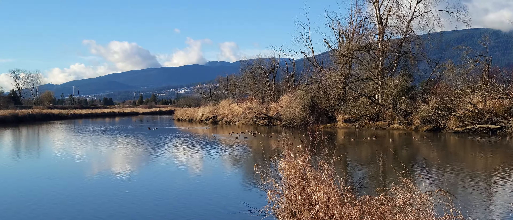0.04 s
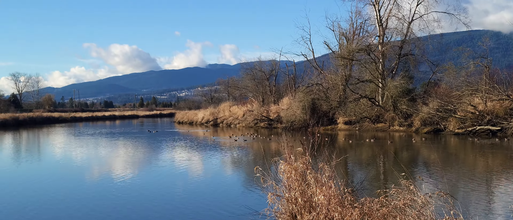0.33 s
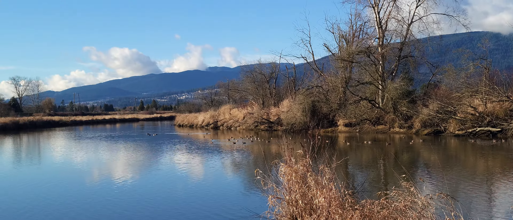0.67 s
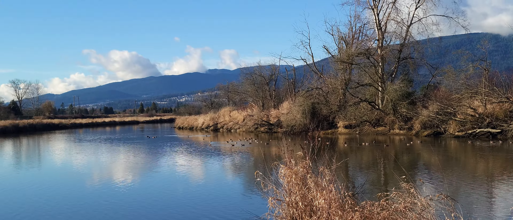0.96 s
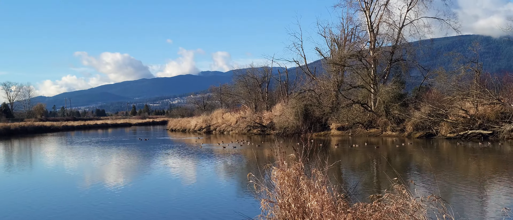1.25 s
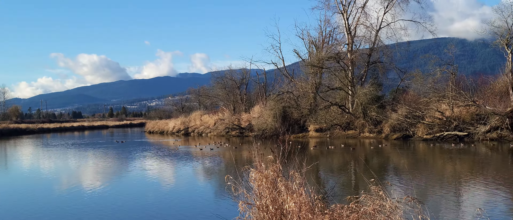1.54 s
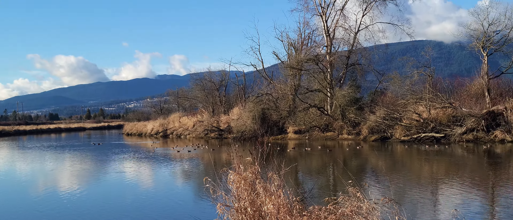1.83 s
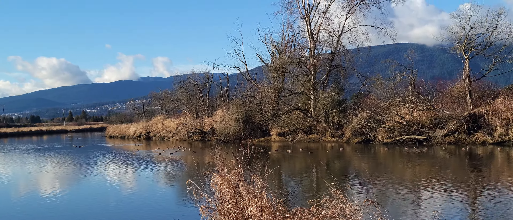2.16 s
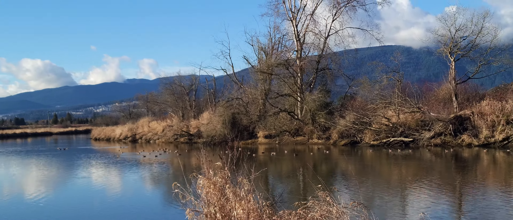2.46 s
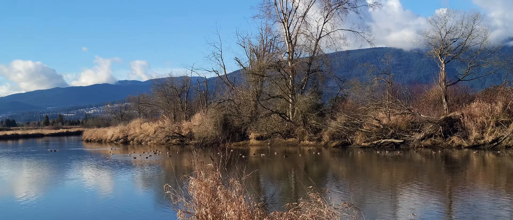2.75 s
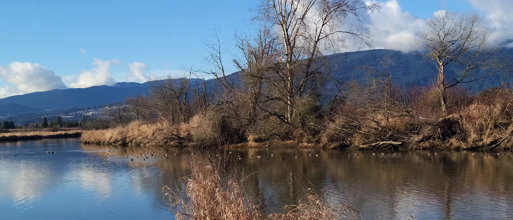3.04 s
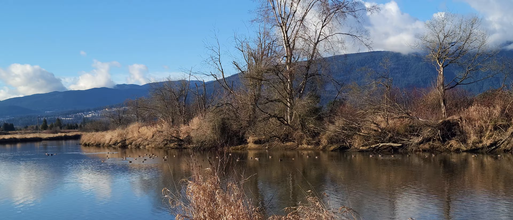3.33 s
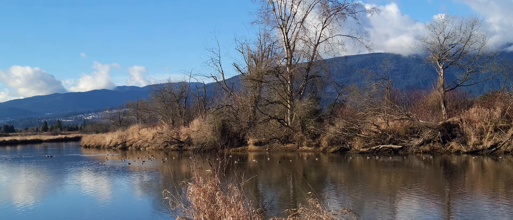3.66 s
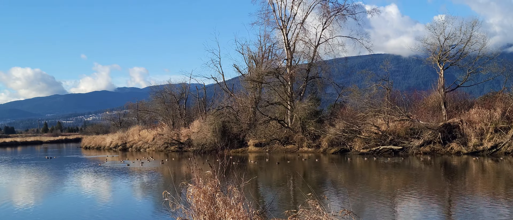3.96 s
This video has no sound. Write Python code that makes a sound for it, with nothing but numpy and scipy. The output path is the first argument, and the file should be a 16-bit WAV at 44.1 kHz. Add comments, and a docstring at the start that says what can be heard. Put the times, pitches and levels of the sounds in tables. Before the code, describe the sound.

A water bird calls in a quiet open marsh. Faint low rumble, soft thumps and a close click come first, then very faint distant whistles, two short, slightly rough yelps from the left with light echoes, and another click.

```python
"""A water bird gives two short, arching yelps in a quiet marsh, and the wooded bank answers faintly.
Each yelp sweeps slightly rough harmonics through the fixed resonances of the throat; the bank
returns two distinct echoes and a scattered tail. Far birds whistle just before and blip after.
Underneath lie a low rumble with soft thumps, a thin, wide hush and very faint ticking,
while a few small dry clicks sound close by."""
import sys
import numpy as np
from scipy import signal
from scipy.fft import rfft, irfft, next_fast_len
from scipy.io import wavfile
from scipy.ndimage import uniform_filter1d, map_coordinates

SR = 44100
rng = np.random.default_rng(int(sys.argv[2]) if len(sys.argv) > 2 else 0)


def put_to_file(sound):
    """Save the sound as 16-bit audio at rate SR, in the file named by the first command-line argument."""
    columns = np.atleast_2d(sound).T  # one column per channel
    safe = np.clip(columns, -1, 1)
    whole_steps = np.round(safe * 32767)
    wavfile.write(sys.argv[1], SR, whole_steps.astype(np.int16))


N = 176400

# Fader ride of the rumble: time_s, level_db
RUMBLE_RIDE = [(0, -48), (.3, -52), (.52, -45.5), (.62, -51), (.85, -47), (1.08, -47), (1.16, -52),
               (1.48, -51), (1.7, -53), (1.98, -55), (2.08, -45.5), (2.22, -52.5), (2.46, -53.5),
               (2.7, -51.5), (4, -49)]
# Tone of the rumble: frequency_hz, gain_db
RUMBLE_EQ = [(15, -23.5), (25, -10.5), (40, -7), (55, -3), (70, -1), (84, 2), (95, -8.5), (120, -17.5),
             (150, -29), (200, -40)]
# Stereo width of the rumble: frequency_hz, side_minus_mid_db
RUMBLE_WIDTH = [(30, -2), (70, -6.5), (150, -7.5)]
# Pan move of the rumble: time_s, left_minus_right_db
RUMBLE_PAN = [(0, -4.5), (1.2, -10.5), (2, -5), (2.7, -1), (3.3, -3), (4, 0)]
# Soft thumps that stand out of the rumble: centre_s, peak_db
THUMPS = [(0.261, -39), (0.816, -41), (0.971, -37.5), (1.103, -36.5), (2.461, -38.5)]

# Fader ride of the hush: time_s, level_db
HUSH_RIDE = [(0.0, -73), (0.54, -73.5), (2.33, -75), (2.96, -74), (3.87, -75.5), (4.0, -75.5)]
# Tone of the hush: frequency_hz, gain_db
HUSH_EQ = [(110, -32), (180, -2), (360, -1.5), (395, -6.5), (495, -4), (543, -6), (597, -3), (719, -3),
           (1010, -13), (1360, -7), (1700, -8), (2880, -17.5), (3950, -20.5), (5040, -25.5), (6310, -23.5),
           (6930, -18.5), (9350, -39.5), (11500, -28.5), (15800, -33)]
# Stereo width of the hush and its swell: frequency_hz, side_minus_mid_db
HUSH_WIDTH = [(200, -2), (300, -2.5), (470, 5.5), (750, 8), (1100, 13), (1600, 0), (2400, 2), (4000, 0),
              (14000, 0.5)]
# Fader ride of the low-mid swell: time_s, level_db
SWELL_RIDE = [(0, -80.5), (1.2, -88.5), (2.3, -100), (2.8, -75), (3.15, -76), (3.5, -74), (4, -82)]
# Tone of the swell: frequency_hz, gain_db
SWELL_EQ = [(120, -51), (260, 3), (350, -3), (550, -7), (1000, -27), (2000, -75)]

# Tone of the faint ticks: frequency_hz, gain_db
TICK_EQ = [(2000, -16), (4000, -7), (9000, -16), (12000, -3), (16000, -16)]
# Close dry clicks: start_s, crack_db, low_cut_hz, high_cut_hz, left_minus_right_db,
# rings as (pitch_hz, level_db, t60_s)
CLICKS = [(.189, -64, 5000, 14100, -6, [(7060, -64, .004), (12200, -70, .004)]),
          (0.6562, -37.5, 1200, 3750, -7, [(1500, -48.5, 0.0044), (3090, -48.5, 0.0085),
          (4200, -53, 0.0086), (6640, -53, 0.0028), (13000, -67, .002)]),
          (1.0344, -63.5, 6000, 14000, -7, [(2970, -61.5, .011), (9440, -66, 0.005), (12500, -68, .005)]),
          (1.050, -67, 8000, 15100, 8, [(12000, -65, .005), (14500, -67, .005)]),
          (1.3128, -64, 9000, 16000, 11, [(12900, -58, .0032), (14700, -58, 0.0035)]),
          (2.715, -69, 6000, 12000, -6, [(6950, -62, 0.0046), (9500, -69, .005)]),
          (2.9746, -70, 5000, 13000, 5, [(1960, -69, 0.019), (5850, -65, 0.022)]),
          (3.39, -50.5, 2780, 8750, 2, [(3400, -59, 0.0048), (4200, -52.5, .004), (5400, -60, 0.005),
          (10200, -58, 0.0097), (15000, -58, .006)]), (3.495, -67, 6000, 15000, -3, [(6070, -64, .005),
          (9900, -77, .005)])]

# Rising whistles of far birds: start_s, end_s, from_hz, to_hz, level_db
WHISTLES = [(2.272, 2.35, 2340, 2540, -74.5), (2.292, 2.338, 3050, 3160, -78.5),
            (2.358, 2.398, 2850, 2960, -75), (2.398, 2.44, 3130, 3190, -77), (2.44, 2.48, 3350, 3550, -82)]
# Far calls heard only as soft blips: centre_s, half_width_s, centre_hz, level_db
BLIPS = [(3.512, .012, 1720, -68.5), (3.905, .025, 1680, -71)]
# How far the yelps and whistles lean left: frequency_hz, left_minus_right_db
BIRD_BALANCE = [(1500, 4), (1850, 4), (2120, 21), (2500, 25), (3200, 6), (4200, 7)]
# Decay of the bank's tail: frequency_hz, t60_s
BANK_DECAY = [(500, 0.53), (2000, 0.4), (3200, 0.32), (6000, 0.24)]

# Pitch arches, one list per yelp: time_s, pitch_hz
YELP_ARCHES = [
    [(2.588, 870), (2.604, 1170), (2.616, 1630), (2.621, 1989), (2.642, 2152), (2.664, 2012), (2.676, 1848),
     (2.680, 1575), (2.703, 1200), (2.725, 1139), (2.74, 940)],
    [(2.856, 940), (2.869, 1200), (2.884, 1620), (2.896, 1830), (2.905, 1824), (2.912, 1590), (2.922, 1450),
     (2.936, 1227), (2.964, 938)],
]
# Drive of each yelp into the throat: level_db, tilt_per_harmonic_db
YELP_DRIVE = [(-43.5, -1), (-42, -1)]
# Harmonics of the voice: multiple, gain_db
HARMONICS = [(1, 7), (2, -4), (3, -41)]
# Resonances of the throat: frequency_hz, gain_db
THROAT_EQ = [(900, -31), (1250, -27.5), (1480, -12.5), (1690, -14.5), (1860, -4.5), (2120, -3), (2290, 2),
             (2700, -14), (3200, 5.5), (3450, -15), (3680, -14), (3850, -31), (4150, -11.5), (4600, -33),
             (7000, -48)]
# Distinct returns from the bank: delay_s, gain_db
ECHOES = [(.085, -20.5), (.133, -30)]


def amp(db):
    """Decibels to gain."""
    return 10 ** (np.asarray(db) / 20)


def unit(x):
    """Scale to rms 1."""
    return x / np.sqrt(np.mean(x ** 2) + 1e-20)


def along(points, hz):
    """Read (frequency_hz, value) points on a log frequency axis."""
    freqs, values = np.transpose(points)
    return np.interp(np.log(hz + 1), np.log(freqs + 1), values)


def automation(points):
    """Join (time_s, value) points into one value per sample."""
    return np.interp(np.arange(N) / SR, *np.transpose(points))


def wobble(per_s):
    """A smooth random curve through per_s knots a second."""
    knots = rng.standard_normal(int(N * per_s / SR) + 4)
    return map_coordinates(knots, [np.arange(N) * per_s / SR])


def filtered(x, response):
    """Pass x through a complex frequency response."""
    size = next_fast_len(N + SR // 2)
    return irfft(rfft(x, size) * response(np.fft.rfftfreq(size, 1 / SR)), size)[..., :N]


def panned(db):
    """Left and right gains for a left-minus-right level."""
    return amp(np.array([np.atleast_1d(db), -np.atleast_1d(db)]) / 2)


def noise_bed(eq, width):
    """Shaped stereo noise whose mid has rms 1."""
    mid = filtered(rng.standard_normal(N), lambda hz: amp(along(eq, hz)))
    side = filtered(rng.standard_normal(N), lambda hz: amp(along(eq, hz) + along(width, hz)))
    return np.array([mid + side, mid - side]) / mid.std()


def gate(start, end, attack_s=0.0086, release_s=0.0095):
    """Attack, hold and release of a note."""
    t = np.arange(N) / SR
    return np.clip((t - start) / attack_s, 0, 1) * np.clip((end - t) / release_s, 0, 1)


def rumble(trim_db=-1, flutter_db=1, thump_hz=68, thump_half_width_s=0.012):
    """A low, uneven rumble with a few soft thumps, at first stronger on the right."""
    t, thumps = np.arange(N) / SR, np.zeros(N)
    level = amp(trim_db + automation(RUMBLE_RIDE) + flutter_db * wobble(14))
    for centre_s, peak_db in THUMPS:
        envelope = amp(peak_db) * np.exp(-((t - centre_s) / thump_half_width_s) ** 2)
        thumps += envelope * np.sin(2 * np.pi * (thump_hz * t + rng.random()))
    roll_off = [(320, -63.5), (600, -120)]
    bed = level * noise_bed(RUMBLE_EQ + roll_off, RUMBLE_WIDTH)
    return panned(automation(RUMBLE_PAN)) * (thumps + bed)


def hush(trim_db=3, drift_db=.4):
    """The wide, steady hush of open country, with a slow swell in the low mids."""
    level = amp(trim_db + automation(HUSH_RIDE) + drift_db * wobble(5.38))
    low_cut = [(60, -35)]
    air = level * noise_bed(low_cut + HUSH_EQ, HUSH_WIDTH)
    swell = amp(automation(SWELL_RIDE)) * noise_bed(SWELL_EQ, HUSH_WIDTH)
    return air + swell


def ticking(per_s=8, level_db=-81, spread_db=2, t60_s=.025):
    """Very faint random ticks of bright noise, like dry reeds touching."""
    hits = (rng.random(N) < per_s / SR) * amp(level_db + spread_db * rng.standard_normal(N))
    decay = amp(-60 * np.arange(SR // 10) / SR / t60_s)
    noise = unit(filtered(rng.standard_normal((2, N)), lambda hz: amp(along(TICK_EQ, hz))))
    return signal.fftconvolve(hits, decay)[:N] * noise


def clicks(snap_s=.0005, rattle=.4, rattle_t60_s=.007, ring_attack_s=.0001):
    """Each click is a tiny, sharp crack of noise with a few brief rings."""
    out, t = np.zeros((2, N + SR)), np.arange(SR // 20) / SR
    envelope = np.exp(-t / snap_s) + rattle * amp(-60 * t / rattle_t60_s)
    ring_attack = (1 - np.exp(-t / ring_attack_s)) ** 2
    for start_s, crack_db, low_cut_hz, high_cut_hz, pan_db, modes in CLICKS:
        burst = rng.standard_normal((2, len(t))) * envelope
        thin = signal.lfilter(*signal.butter(1, low_cut_hz, "highpass", fs=SR), burst)
        crack = signal.lfilter(*signal.butter(2, high_cut_hz, fs=SR), thin)
        rings = np.zeros_like(crack)
        for hz, db, t60_s in modes:
            cycles = hz * t + rng.random() + rng.random((2, 1)) / 4  # phase offsets add width
            rings += amp(db - 60 * t / t60_s) * np.sin(2 * np.pi * cycles)
        onset = round(start_s * SR)
        out[:, onset:onset + len(t)] += panned(pan_db) * (amp(crack_db) * crack + ring_attack * rings)
    return out[:, :N]


def far_whistles(jitter=.012, flicker_db=3, send_db=14):
    """Broken, overlapping whistles from across the marsh, wetter than the near bird."""
    t, voices = np.arange(N) / SR, np.zeros(N)
    for start_s, end_s, from_hz, to_hz, db in WHISTLES:
        pitch = np.interp(t, [start_s, end_s], [from_hz, to_hz]) * (1 + jitter * wobble(260))
        envelope = amp(db + flicker_db * wobble(44.08)) * gate(start_s, end_s)
        voices += envelope * np.sin(2 * np.pi * np.cumsum(pitch) / SR)
    return from_left(voices) + amp(send_db) * bank_tail(voices)


def from_left(x, lag_s=0.00023):
    """A call from the left reaches the right channel later and weaker."""
    right = filtered(x, lambda hz: amp(-along(BIRD_BALANCE, hz)) * np.exp(-2j * np.pi * hz * lag_s))
    return np.array([x, right])


def bank_tail(x, return_db=-17, pan_db=2, rise_s=0.015, clump_db=6, clumps_per_s=130):
    """Trees and reeds scatter a tail back over the water; it arrives in clumps, tree by tree."""
    hz, t, noise = signal.stft(rng.standard_normal((2, SR)), SR, nperseg=256)
    decay = amp(-60 * t / along(BANK_DECAY, hz)[:, None])
    bloom = 1 - np.exp(-t / rise_s)
    tail = signal.istft(noise * decay * bloom, SR, nperseg=256)[1]
    tail *= amp(clump_db * np.tanh(wobble(clumps_per_s)[:tail.shape[1]]))
    wet = signal.fftconvolve(x[None], tail / np.linalg.norm(tail[0]), axes=1)[:, :N]
    return amp(return_db) * panned(pan_db) * wet


def water_bird(jitter=.011, flutter_db=1.9, rasp=.12, effort_db_per_octave=6, full_effort_hz=2100):
    """Each yelp sweeps rough harmonics through the throat's resonances, pushing harder as it rises."""
    voice = np.zeros(N)
    for arch, (drive_db, tilt_db) in zip(YELP_ARCHES, YELP_DRIVE):
        pitch = uniform_filter1d(automation(arch), size=180) * (1 + jitter * wobble(350))
        phase = 2 * np.pi * np.cumsum(pitch) / SR
        tone = sum(amp(db + (k - 1) * tilt_db) * np.sin(k * phase) for k, db in HARMONICS)
        effort_db = effort_db_per_octave * np.log2(pitch / full_effort_hz) + flutter_db * wobble(140)
        envelope = amp(drive_db + effort_db) * gate(arch[0][0], arch[-1][0])
        voice += envelope * tone * (1 + rasp * wobble(1000))
    return filtered(voice, lambda hz: amp(along(THROAT_EQ, hz)))


def bank_echoes(x, shimmer_db=3, shimmer_per_s=70):
    """The nearest stretches of bank slap the call back, with a wavering level."""
    taps = filtered(x, lambda hz: sum(amp(db) * np.exp(-2j * np.pi * hz * s) for s, db in ECHOES))
    return taps * amp(shimmer_db * wobble(shimmer_per_s))


def far_blips(half_band_hz=170):
    """Calls so distant that only soft blips of narrow-band noise are heard."""
    t, out = np.arange(N) / SR, np.zeros((2, N))
    for centre_s, half_width_s, centre_hz, db in BLIPS:
        noise = rng.standard_normal((2, N))
        band = unit(filtered(noise, lambda hz: 1 / (1 + ((hz - centre_hz) / half_band_hz) ** 2)))
        out += amp(db) * np.exp(-((t - centre_s) / half_width_s) ** 2) * band
    return out


def scene():
    """The bird and its echoes up front, over the quiet marsh."""
    voice = water_bird()
    yelps = from_left(voice + bank_echoes(voice)) + bank_tail(voice)
    return yelps + far_whistles() + far_blips() + clicks() + ticking() + rumble() + hush()


def record(dry):
    """A brick-wall high cut on the whole mix."""
    high_cut_hz = 15900
    return filtered(dry, lambda hz: hz < high_cut_hz)


dry = scene()
out = record(dry)
put_to_file(out)
```